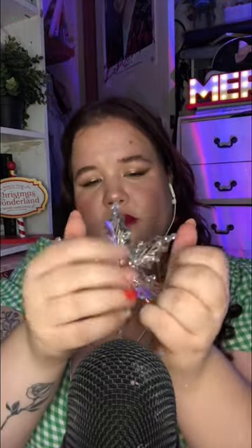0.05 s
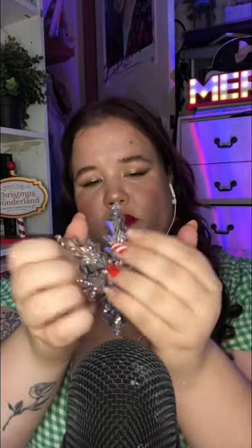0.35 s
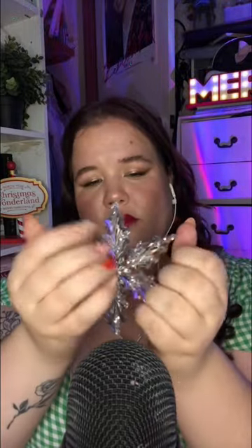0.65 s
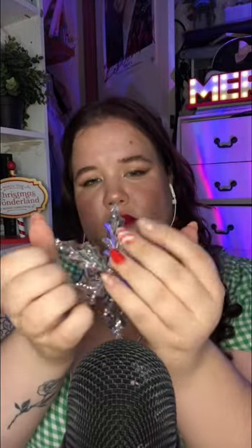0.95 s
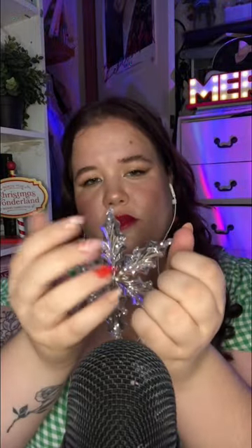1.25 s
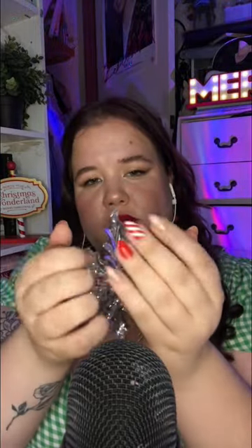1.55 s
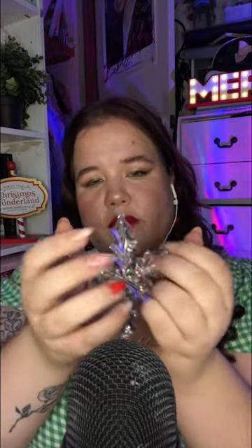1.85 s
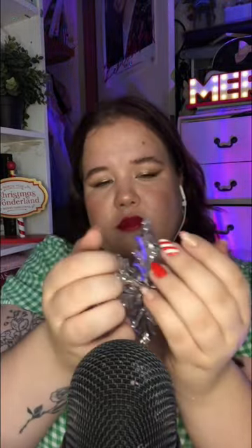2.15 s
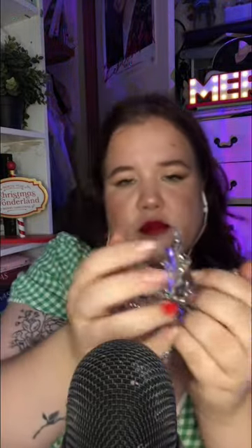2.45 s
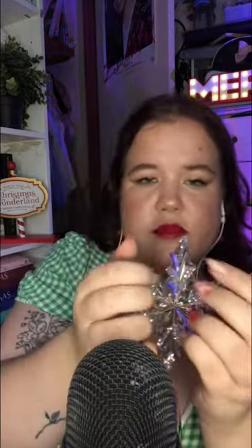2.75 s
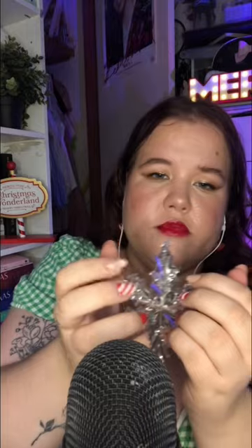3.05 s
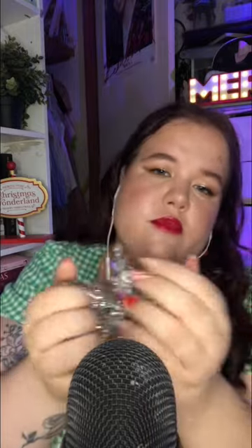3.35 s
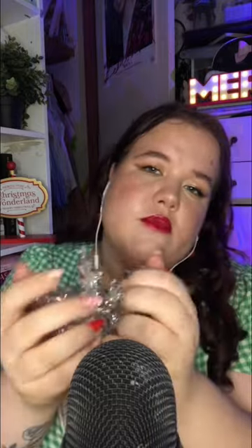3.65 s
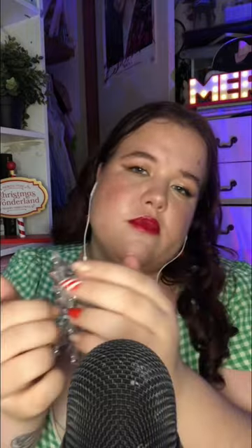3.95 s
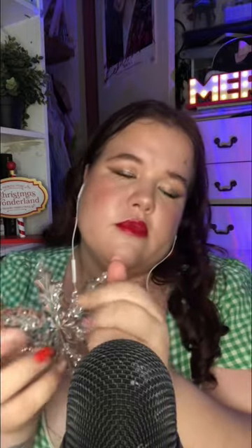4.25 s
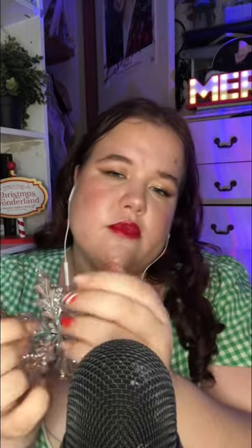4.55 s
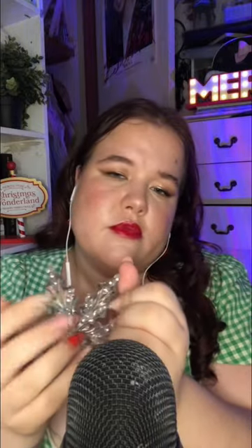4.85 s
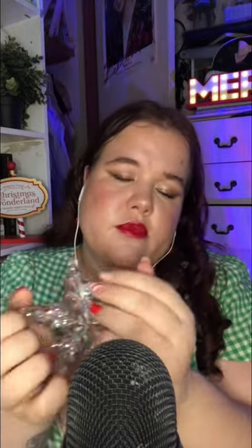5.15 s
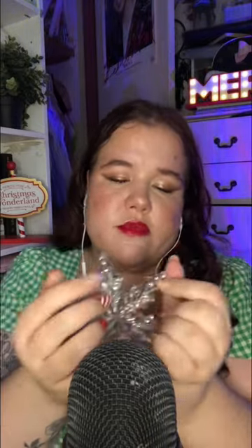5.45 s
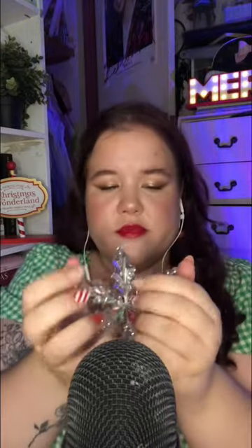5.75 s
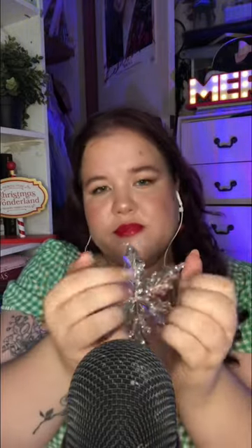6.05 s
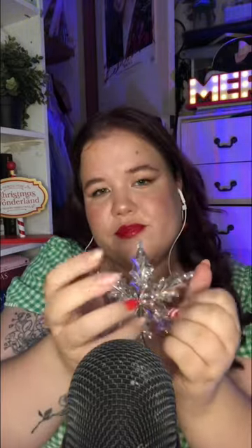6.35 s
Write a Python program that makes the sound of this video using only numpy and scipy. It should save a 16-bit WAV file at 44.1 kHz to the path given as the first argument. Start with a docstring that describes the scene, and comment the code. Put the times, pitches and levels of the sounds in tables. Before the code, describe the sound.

Long fingernails tap and scratch a ridged plastic snowflake ornament right at the microphone. The taps begin immediately: crisp, bright, dry clicks, fast and irregular, varying in strength and barely ringing. From about 0.1 seconds, very short gritty scratches come between them as a nail snaps over the ridges. From around 0.5 seconds, the fingertips add occasional dull, damped thumps as they push on the ornament. These are strongest and most frequent between 4 and 5 seconds, where the scratching also gets a little heavier. The dense run of clicks and scrapes carries on without a real pause until the end at about 6.4 seconds. Underneath is the faint, steady hush of a small room and a low rumble from the moving hands, swelling slightly near 2.4 and 4.2 seconds. Everything sounds very close, with little reverberation.

```python
"""Long fingernails tap and scratch a ridged plastic snowflake ornament right at a microphone.
Over the hush of a small room and the rumble of the hands, taps begin at once: each impact excites
the modes of the nail and the ornament's arms. From 0.11 s scratches come between them, the nail
snapping over ridge after ridge with fine stick-slip grit. From 0.45 s the fingers add dull, damped
thumps, strongest between 4 and 5 s. Taps and scratches go on to the end, at 6.4 s."""
import sys
import numpy as np
from scipy import signal
from scipy.fft import rfft, irfft, next_fast_len
from scipy.io import wavfile
from scipy.ndimage import uniform_filter1d

SR = 44100
rng = np.random.default_rng(int(sys.argv[2]) if len(sys.argv) > 2 else 0)


def waveform_to_disk(signal):
    """Save audio, clipped to [-1, 1], as 16-bit WAV at the path in sys.argv[1]."""
    frames = np.transpose(np.atleast_2d(signal))
    scaled = np.clip(frames, -1, 1) * 32767
    samples = np.round(scaled).astype(np.int16)
    wavfile.write(sys.argv[1], SR, samples)


N = 281799
TOP_HZ = 16450  # upper band limit

# modes of the ornament's arms: f/Hz, relative level/dB, t60/s
ARM_MODES = [(982, -30, 0.027), (2057, -41.5, 0.056), (2275, -39, 0.06), (2756, -37.5, 0.018),
             (3725, -28, 0.027), (6500, -30, 0.022), (7450, -19.5, 0.012), (8270, -24.5, 0.0092),
             (9360, -20, 0.0063)]
# spectrum of nail friction: f/Hz, relative level/dB
GRIT_SPECTRUM = [(300, -44), (750, -13), (1000, 1), (2300, -1.5), (4700, -5), (7000, 5), (11000, 2),
                 (15500, -3)]
# drags across the ridges, in relative levels:
# start t/s, end t/s, snap level/dB, body re snap/dB, edge re snap/dB, grit level/dB
SCRATCHES = [(.114, 0.131, -23.5, -11, -1.5, -49.5), (.256, 0.271, -32.5, -2.5, 4, -35.5),
             (0.379, 0.405, -35, -6.5, 7, -40), (0.433, .462, -28.5, -10.5, -4.5, -40),
             (0.793, 0.827, -34.5, -9.5, 1.5, -43.5), (.983, 1.006, -35, -6, 5, -49),
             (1.051, 1.09, -32.5, -10.5, -3, -40.5), (1.122, 1.129, -41.5, -5.5, 10, -44),
             (1.408, 1.426, -30.5, -8, 0, -48), (1.602, 1.636, -39.5, -3, 3.5, -57),
             (1.672, 1.7, -39, -5, 3.5, -36), (1.782, 1.808, -28, -7.5, -1, -38.5),
             (1.833, 1.848, -30.5, -7.5, 6.5, -44), (2.002, 2.015, -24.5, -10, 0, -39),
             (2.049, 2.07, -32.5, -6, 1, -50), (2.314, 2.328, -43, 0, 1, -42),
             (2.336, 2.36, -26.5, -7, -1.5, -36.5), (2.419, 2.43, -23.5, -8, -5.5, -47),
             (2.466, 2.485, -27.5, -6, -1.5, -34), (2.539, 2.555, -36, -4.5, 2.5, -42),
             (2.862, 2.882, -36.5, -3.5, 8, -35), (3.075, 3.096, -36, -1.5, 0, -41),
             (3.159, 3.19, -42.5, -1, 11, -47), (3.199, 3.254, -40.5, -3, 0, -46.5),
             (3.45, 3.508, -30.5, -8.5, 1, -44.5), (3.528, 3.569, -41, -3, -3.5, -49),
             (3.987, 4.014, -31.5, -8.5, 0.5, -46), (4.099, 4.19, -34, -6, -4, -40),
             (4.25, 4.269, -38, -8, 7, -48), (4.276, 4.3, -28, -3.5, 1, -32.5),
             (4.407, 4.426, -24.5, -13, -2.5, -57), (4.45, 4.46, -37, -7, 2, -49),
             (4.486, 4.496, -25.5, -7, -2, -45), (4.584, 4.599, -34, -13, 0.5, -38.5),
             (4.74, 4.765, -26, -11, 4.5, -28), (4.893, 4.899, -24.5, -9, 9.5, -32.5),
             (4.928, 5.01, -42, -5.5, -3, -55), (5.016, 5.033, -21.5, -8, 1, -46),
             (5.065, 5.107, -39, -7.5, 2, -47), (5.16, 5.167, -34, -6, -3, -37.5),
             (5.268, 5.292, -50.5, 5, 4, -52), (5.495, 5.541, -38.5, -5.5, 7.5, -47),
             (5.799, 5.832, -33, -2, 2.5, -45), (5.918, 5.961, -35.5, -2.5, 2, -46),
             (6.202, 6.241, -57.5, 7.5, -1, -57), (6.244, 6.269, -36, -5.5, 5, -43)]
# fingers pushing the ornament: t/s, relative level/dB, nominal f/Hz
PUSHES = [(.454, -22, 123), (.668, -15, 208), (.894, -23, 122.7), (1.8, -20.5, 114), (1.952, -21, 80.5),
          (2.464, -25, 85), (2.485, -20, 111.3), (2.87, -14, 128), (3.214, -23.5, 108.3),
          (3.429, -16.5, 109.8), (3.671, -19, 220.8), (4.123, -17, 136.5), (4.156, -16, 164.8),
          (4.184, -14.5, 165), (4.206, -12, 164), (4.254, -16, 104.5), (4.277, -13, 160), (4.294, -9, 125),
          (4.596, -13.5, 148.1), (4.626, -21, 129.8), (4.722, -15, 200.6), (4.735, -10.5, 117),
          (4.758, -14, 112), (4.848, -20, 94.94), (5.106, -15.5, 159.5), (5.386, -15.5, 168),
          (5.695, -19.5, 162.3)]


def amp(db):
    """Amplitude ratio of a level in decibels."""
    return 10 ** (np.asarray(db) / 20)


def unit(x):
    """Normalisation to rms 1."""
    return x / np.sqrt(np.mean(x ** 2) + 1e-20)


def along(points, hz):
    """Interpolation of (f/Hz, value) points on a logarithmic frequency axis."""
    f, v = np.transpose(points)
    return np.interp(np.log(hz + 1), np.log(f), v)


def filtered(x, response):
    """Zero-phase filtering: the spectrum along the last axis times a frequency response."""
    n = x.shape[-1]
    m = next_fast_len(n + n // 4)
    return irfft(rfft(x, m) * response(np.fft.rfftfreq(m, 1 / SR)), m)[..., :n]


def below(hz, edge_hz, order):
    """Low-pass magnitude response."""
    return 1 / (1 + (hz / edge_hz) ** order)


def coloured(x, spectrum):
    """Spectral shaping by (f/Hz, level/dB) points, at rms 1."""
    return unit(filtered(x, lambda hz: amp(along(spectrum, hz))))


def noise(response, n=N):
    """White noise through a frequency response, at rms 1."""
    return unit(filtered(rng.standard_normal(n), response))


def add(track, s, sound):
    """Superposition of a sound on the track at s seconds."""
    i = max(0, round(s * SR))
    part = track[i:i + len(sound)]
    part += sound[:len(part)]


def background(whine_hz=7820, half_width_hz=110):
    """Stationary noise: broadband room hush and microphone hiss, with a narrow-band whine."""
    # spectrum of the noise floor: f/Hz, relative level/dB
    hush_spectrum = [(40, 0), (130, -4), (280, -10), (400, -19), (700, -17), (1000, -25), (2200, -29),
                     (4000, -36), (7000, -38), (16000, -41)]
    whine = noise(lambda hz: below(np.abs(hz - whine_hz), half_width_hz, order=3))
    return amp(-48) * coloured(rng.standard_normal(N), hush_spectrum) + amp(-67) * whine


def handling(hits, rumble_db=-2, surge_exponent=0.36):
    """Amplitude-modulated rumble: it swells as the hands move and surges at pushes and contacts."""
    # hands moving at the microphone: t/s, relative level/dB
    movement = [(0.0, -39.5), (1.62, -38.5), (1.97, -33.5), (2.26, -39.5), (2.37, -29), (3.98, -39),
                (4.2, -31), (6.39, -43)]
    # spectrum of their rumble: f/Hz, relative level/dB
    rumble_spectrum = [(20, -8.5), (33, 5.5), (55, -5.5), (85, -10), (170, -13.5), (300, -27.5), (600, -41),
                       (3000, -100)]
    force = np.full(N, amp(-34))
    for s, level, _ in PUSHES:
        add(force, s - .025, amp(level) * np.hanning(SR // 12))
    for s, level, body, *_ in hits:
        add(force, s - .02, amp(level + body) * np.hanning(SR // 16))
    surge = (force / uniform_filter1d(force, size=16000)) ** surge_exponent
    swell = amp(np.interp(np.arange(N) / SR, *np.transpose(movement)) + rumble_db)
    return swell * surge * coloured(rng.standard_normal(N), rumble_spectrum)


def contacts(ridges_per_s=150, jitter=.22, level_spread_db=4, colour_spread_db=3):
    """Single impacts and quasi-periodic ridge trains: t/s, snap/dB, body/dB, edge/dB, gap/s."""
    # single nail taps: t/s, relative snap level/dB, body re snap/dB, edge re snap/dB
    taps = [(.0097, -20, -2.5, 4.5), (0.0565, -26, -5, -10), (.169, -30, -7.5, 7.5),
            (.218, -36.5, -4.5, -2), (0.2725, -20.5, -7, 0), (.3552, -23, -10.5, -3), (.397, -26, -7.5, 0),
            (.417, -26, -7, -10), (.669, -29, 4, -11.5), (0.7036, -29, -6, -12), (0.8395, -33, -12, 1),
            (0.8713, -25.5, -4.5, 0), (.894, -34.5, 0.5, -11), (.975, -28.5, -7.5, 1.5),
            (1.0467, -22, -10, 5.5), (1.3447, -21, -6, 5.5), (1.38, -24, -5.5, 6.5), (1.43, -23, -18, -5),
            (1.4683, -36, -9, 4), (1.4814, -25, -11, 2.5), (1.5557, -45, -8, 8), (1.5908, -29, -8, 1.5),
            (1.764, -32.5, -6, 6.5), (1.7935, -14.5, -16, -7.5), (1.952, -34.5, 0, 4),
            (1.9806, -20, -11, 2.5), (2.0423, -19.5, -12, 1), (2.0606, -22, -11, 2.5),
            (2.1188, -32.5, -1, -3.5), (2.14, -41, -10, 6.5), (2.3022, -31, -7, -1), (2.374, -33, -2, 10.5),
            (2.3884, -37, -2, -2), (2.5683, -30.5, -9, 3), (2.605, -22, -11, -0.5), (2.619, -24.5, -7.5, 7),
            (2.6322, -17.5, -15, -5), (2.687, -20, -6.5, 7.5), (2.7057, -24, -14, -7.5),
            (2.7265, -40, -7, 11), (2.779, -31.5, 0, 5.5), (2.8739, -21.5, -2, 8.5),
            (2.9123, -25, -6.5, -3.5), (3.035, -30.5, -4, -0.5), (3.0933, -23, -3.5, -7),
            (3.1432, -35.5, 5.5, 6), (3.2135, -18, -6, -4), (3.2468, -20.5, -10, 3.5),
            (3.2934, -42, -5, 10.5), (3.32, -29.5, -8.5, 1.5), (3.3676, -34, -6, 5.5),
            (3.4218, -32.5, -7, 8), (3.431, -17, -9.5, -1), (3.6205, -19, -12.5, -15),
            (3.6805, -28.5, -3.5, -4.5), (3.7436, -15.5, -14.5, -4.5), (3.7616, -38, -4, 16),
            (3.8102, -22.5, -9, 8), (3.8465, -18, -15, 1), (3.861, -16, -15.5, 2), (3.8787, -20, -16, 0.5),
            (3.8902, -21, -18.5, 3), (4.069, -39, -9, 9), (4.123, -21.5, -18, -1),
            (4.2066, -15.5, -6, -0.5), (4.3443, -23.5, -9, -3), (4.3756, -17.5, -9, -9.5),
            (4.413, -19.5, -18, -1), (4.556, -46, -1, 2), (4.5876, -22.5, -19, 6), (4.655, -43, -1.5, -4),
            (4.7229, -20, -9, -11), (4.7687, -19.5, -5, -1), (4.8099, -20.5, -6.5, -2),
            (4.8494, -26, 1.5, -4.5), (4.8968, -19.5, -11, 2), (4.9425, -16.5, -20, 3),
            (4.983, -19, -12, 3), (5.1225, -35, -1, -1), (5.2912, -19.5, -9.5, -3.5),
            (5.3379, -22, 0.5, 11), (5.3691, -34, -4, 8), (5.383, -22, -5, 6), (5.442, -22, -6.5, -4),
            (5.5683, -29.5, -6, -1), (5.696, -28, 0.5, -6.5), (5.7158, -33.5, -3, 2.5),
            (5.7353, -20, -16, -1.5), (5.7454, -22, -7.5, -2), (5.772, -36.5, 3, 6),
            (5.7863, -24, -10.5, -5), (5.8267, -21, -13, 3.5), (5.911, -20.5, -9.5, 2.5),
            (5.976, -24, -10.5, 0), (5.9895, -22.5, -12.5, 1.5), (6.0186, -26, -9, 6),
            (6.0335, -25.5, -8, 4), (6.085, -33.5, -8, 9.5), (6.13, -32, -6, 6.5), (6.261, -27.5, -9, 4.5),
            (6.2942, -35.5, 4, 12), (6.3816, -30.5, 4.5, 6)]
    taps = np.array(taps, float)
    rows = [np.column_stack([taps, np.diff(taps[:, 0], prepend=0)])]
    for start, end, level, body, edge, _ in SCRATCHES:
        k = np.arange(max(1, int(np.ceil((end - start) * ridges_per_s))))
        late, hard, hollow, sharp = np.clip(rng.standard_normal((len(k), 4)), -2, 2).T
        s = start + (k + jitter * late * (k > 0)) / ridges_per_s
        rows.append(np.column_stack([s, level + level_spread_db * hard, body + colour_spread_db * hollow,
                                     edge + colour_spread_db * sharp, np.full(len(k), 1 / ridges_per_s)]))
    return np.vstack(rows)


def impacts(clock, gap, edge):
    """Impulse response of nail and ornament, led in by a skid; one row per contact."""
    count, t = len(edge), np.maximum(clock, 0)
    tuning, strength, slide, bounce, delay = rng.standard_normal((count, 5)).T[:, :, None]
    # a sharper contact rings the nail at a higher pitch
    nail_hz = np.clip(9300 * amp(0.43 * edge + 1.5 * tuning), 6500, 15000)
    nail = amp(-11 + strength - 60 * t / 0.0051) * np.cos(2 * np.pi * nail_hz * t)
    # the dense high modes of the plastic die within milliseconds
    plastic = (amp(-18 - 60 * t / .005) + amp(-30 - 60 * t / .026)) * rng.standard_normal((count, len(t)))
    # blunt taps set the arms ringing; sharp flicks move them less
    ring = amp(-.35 * edge) * arm_ring(t, count)
    # the nail rebounds within a fraction of a millisecond, colouring each click differently
    rebound = .5 * bounce * (np.round(t * SR) == np.ceil(.00018 * SR * amp(5 * delay)))
    # in mid-stroke the nail skids before it lets go; a tap after a long gap arrives cleaner
    skid_db = -32 + 5 * slide - 10 * np.minimum(gap / 0.11, 1) + 60 * np.minimum(clock, 0) / 0.028
    skid = amp(skid_db) * rng.standard_normal((count, len(t)))
    struck = (clock == 0) + rebound + nail + plastic + ring
    polarity = np.sign(rng.standard_normal((count, 1)))
    return np.where(clock >= 0, struck, skid) * polarity


def arm_ring(t, count, detune=0.014):
    """Modal superposition: the contact point weights the arms' modes and the grip detunes them."""
    hz, db, t60 = np.transpose(ARM_MODES)
    strength = amp(db) * rng.standard_normal((count, len(hz)))
    pitch = hz * (1 + detune * rng.standard_normal((count, len(hz))))
    return sum(strength[:, [k]] * amp(-60 * t / t60[k]) * np.sin(2 * np.pi * pitch[:, [k]] * t)
               for k in range(len(hz)))


def clicks(hits, body_hz=800, snap_hz=5300, edge_hz=10500, contact_s=.0026):
    """Impact transients in three bands (hollow body, snap, sharp edge), with the ornament's recoil."""
    s, level, body, edge, gap = hits.T
    lead = SR // 150  # samples of skid before the impact
    clock = np.arange(-lead, SR // 20) / SR
    t = np.maximum(clock, 0)
    blow = impacts(clock, gap[:, None], edge[:, None])

    def band(low_hz, high_hz, db):
        """One band of every impact, scaled by its energy per contact time."""
        part = filtered(blow, lambda hz: below(hz, high_hz, 16) * (1 - below(hz, low_hz, 16)))
        power = np.sum(part[:, clock < contact_s] ** 2, axis=1) / (contact_s * SR)
        return part * (amp(db) / np.sqrt(power))[:, None]

    sounds = band(body_hz, snap_hz, level + body - .5)
    sounds += band(snap_hz, edge_hz, level - 1)
    sounds += band(edge_hz, TOP_HZ, level + edge - .86)
    # the whole ornament recoils: one low push, then a slow sway in the fingers
    u = t / 0.0024
    knock = 2 * amp(-2) * (1 - u) * np.exp(-u) * (1 - np.exp(-t / 0.00029))
    sway_hz = 45 * amp(3.1 * rng.standard_normal((len(s), 1)))
    sway = amp(-3) * np.sin(2 * np.pi * sway_hz * t) * (1 - t / t[-1])
    sounds += amp(level + body)[:, None] * (knock - sway)
    track = np.zeros(N + lead)
    for start, sound in zip(s, sounds):
        add(track, start, sound)
    return track[lead:]


def grit(hits, slips_per_s=600, spread_db=6, rasp_hz=2300, rub_hz=205):
    """Stick-slip friction under a dragging nail, in the scratches and faintly at every contact."""
    pressure = np.zeros(N)
    for start, end, *_, db in SCRATCHES:
        pressure[int(start * SR):int(end * SR)] = amp(db - 1)
    pressure = uniform_filter1d(pressure, size=200)
    for s, level in hits[:, :2]:
        add(pressure, s - .003, amp(level - 27) * np.hanning(SR // 55))
    slips = (rng.random(N) < slips_per_s / SR) * amp(spread_db * np.clip(rng.standard_normal(N), -2, 2))
    slips = unit(slips * rng.choice([-1, 1], N)) + 0.22 * rng.standard_normal(N)
    t = np.arange(SR // 20) / SR
    ring = sum(amp(db - 60 * t / t60) * np.cos(2 * np.pi * hz * t) for hz, db, t60 in ARM_MODES)
    scratch = coloured(slips + 0.18 * signal.fftconvolve(slips, ring)[:N], GRIT_SPECTRUM)
    # pressed harder, the flat of the nail rasps in the midrange
    weight = np.sqrt(np.abs(pressure) / pressure.max())
    rasp = amp(-3) * noise(lambda hz: below(np.abs(hz - rasp_hz), 1070, order=2))
    # the dragging finger also shakes the whole ornament: a low, hollow rub
    rub = amp(6) * noise(lambda hz: below(hz, rub_hz, order=3) * (1 - below(hz, 68, order=2)))
    return pressure * (scratch + weight * (rasp + rub))


def grazes(hits, graze_db=-28, ticks_per_s=110, spread_db=5):
    """Shot noise: other nails brush the ridges, ticking faintly in the wake of each contact."""
    power = np.zeros(N)
    for s, level in hits[:, :2]:
        add(power, s, amp(level) ** 2 * np.hanning(SR // 20))
    ticks = (rng.random(N) < ticks_per_s / SR) * amp(spread_db * np.clip(rng.standard_normal(N), -2, 1))
    return amp(graze_db) * np.sqrt(power) * coloured(ticks, GRIT_SPECTRUM)


def room(x, wet_db=-20, delay_s=0.0041):
    """Diffuse reverberation, dulled by soft furnishings, different for each position of the hands."""
    # reverberation time of the room: f/Hz, t60/s
    decay_times = [(200, 0.88), (4000, 0.43), (9000, 0.094), (16000, 0.61)]
    wet, step = np.zeros(N), SR // 4
    for i in range(0, N, step):
        hz, t, spectra = signal.stft(rng.standard_normal(SR // 2), SR, nperseg=256)
        decay = amp(-60 * t / along(decay_times, hz)[:, None])
        tail = signal.istft(spectra * decay, SR, nperseg=256)[1]
        add(wet, i / SR + delay_s, signal.fftconvolve(x[i:i + step], tail / np.linalg.norm(tail)))
    return amp(wet_db) * filtered(wet, lambda hz: below(hz, 12700, order=4))


def thumps(gain_db=2, skin_db=-16):
    """Heavily damped oscillation: soft fingertip pushes sag in pitch, with a dull puff of skin."""
    track, t = np.zeros(N), np.arange(SR // 12) / SR
    attack = 1 - np.exp(-t / 0.0009)
    for s, db, hz in PUSHES:
        cycles = hz * (0.5 * t + 0.0021 * (1 - np.exp(-t / 0.0022)))
        skin = noise(lambda f: below(f, 659, order=3), len(t))
        push = np.sin(2 * np.pi * cycles) + amp(skin_db) * skin
        t60 = 4.64 / hz
        add(track, s, amp(db + gain_db - 60 * t / t60) * push * attack)
    return track


def scene():
    """Superposition of the ornament's direct sound, its reverberation, rumble and hush, in mono."""
    hits = contacts()
    ornament = clicks(hits) + grit(hits) + grazes(hits) + thumps()
    return (ornament + room(ornament) + handling(hits) + background())[None]


def record(dry):
    """Overload and band limiting: the sharpest spikes clip, then a steep low-pass follows."""
    return filtered(np.clip(dry, -1, 1), lambda hz: below(hz, TOP_HZ, order=120))


dry = scene()
out = record(dry)
waveform_to_disk(out)
```